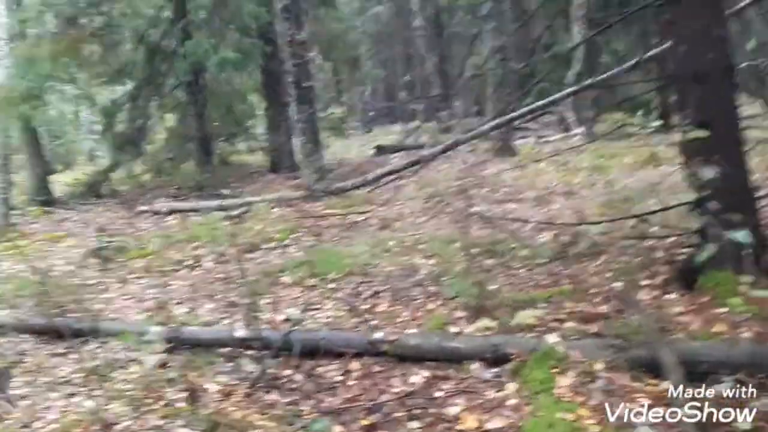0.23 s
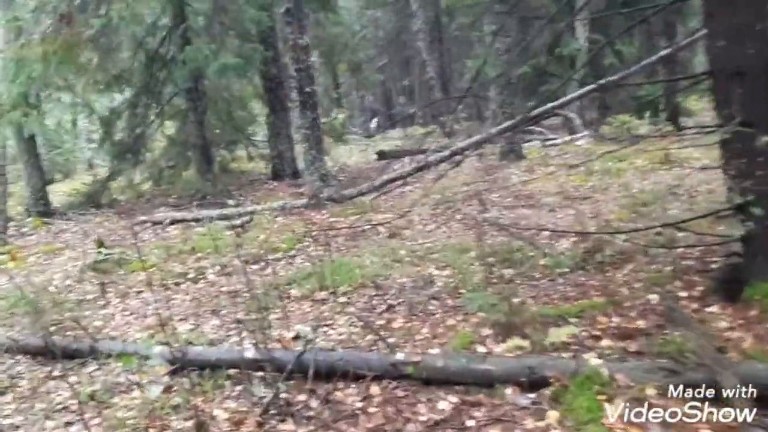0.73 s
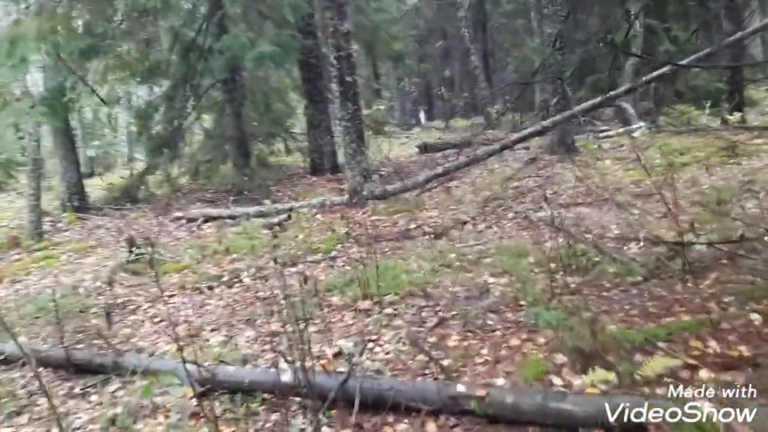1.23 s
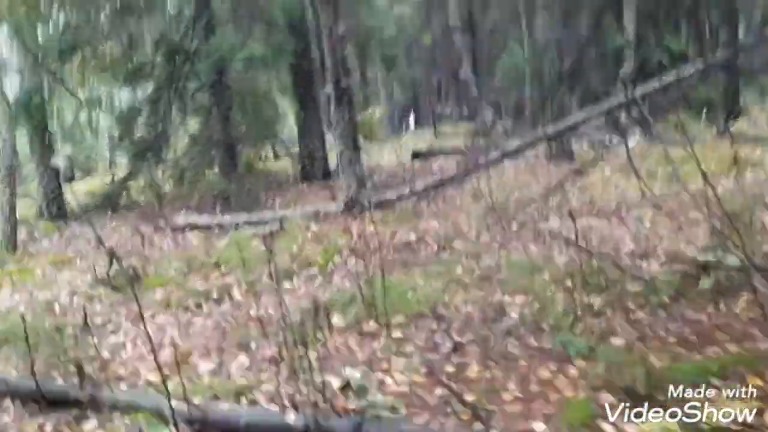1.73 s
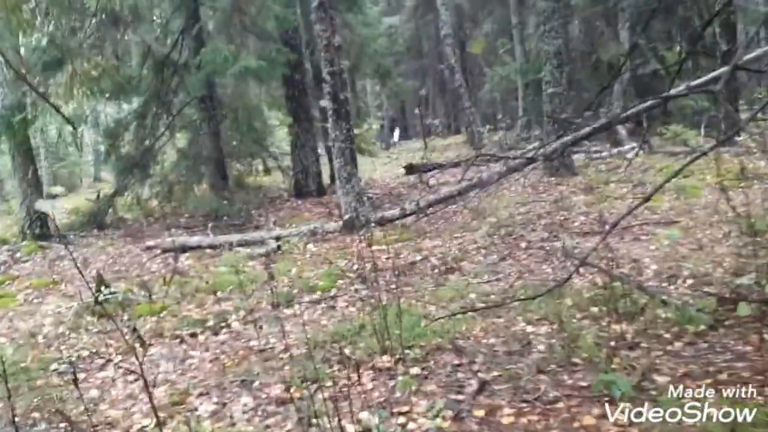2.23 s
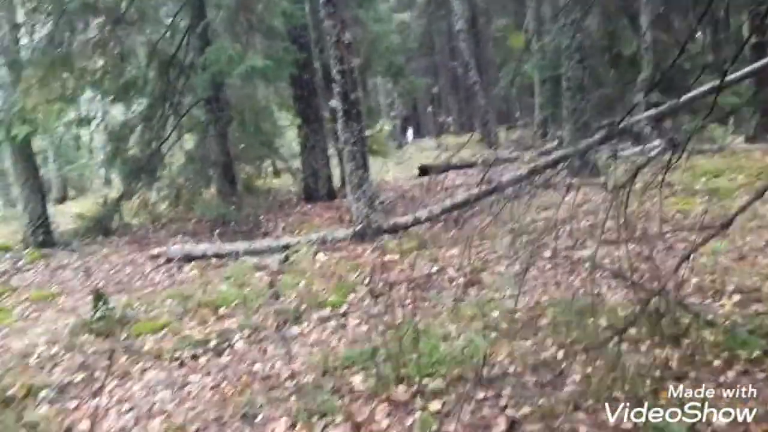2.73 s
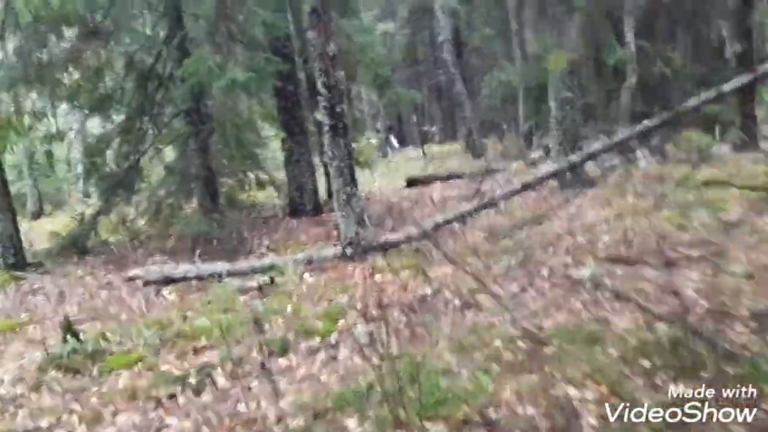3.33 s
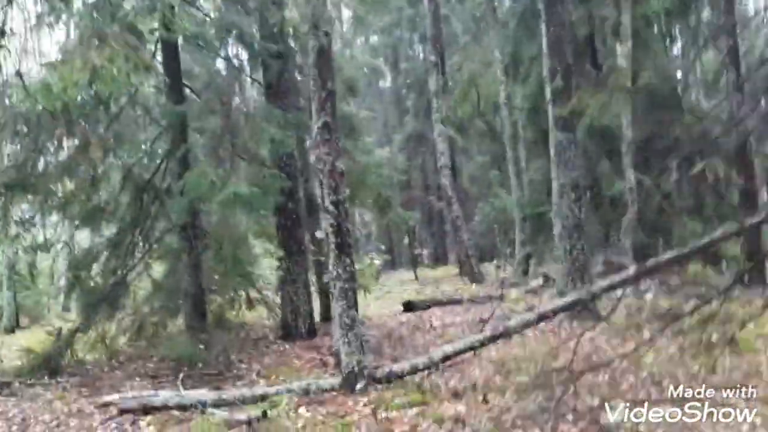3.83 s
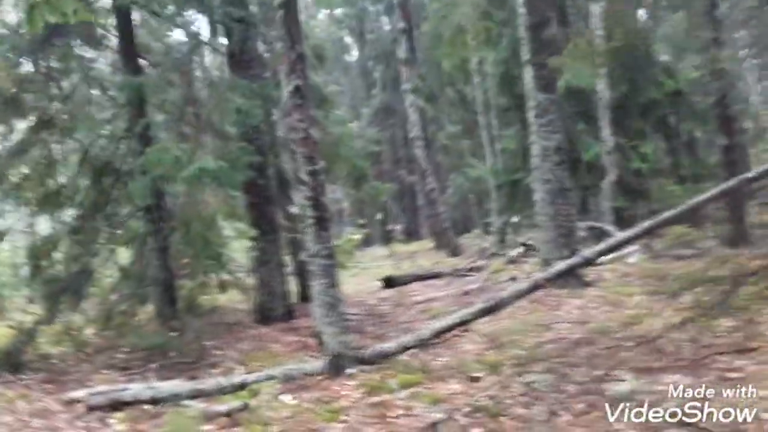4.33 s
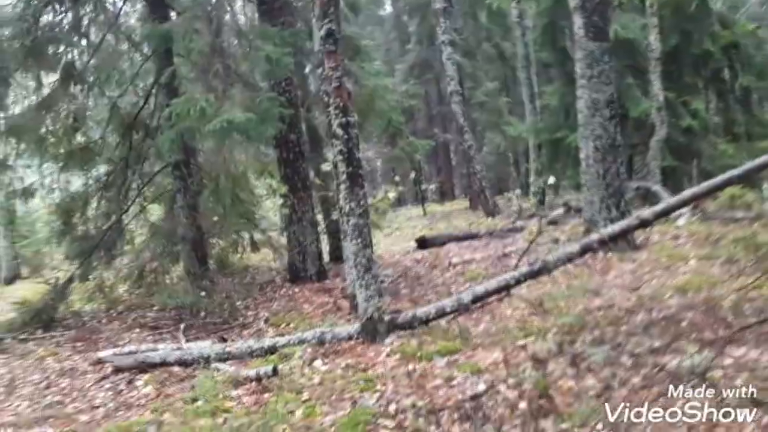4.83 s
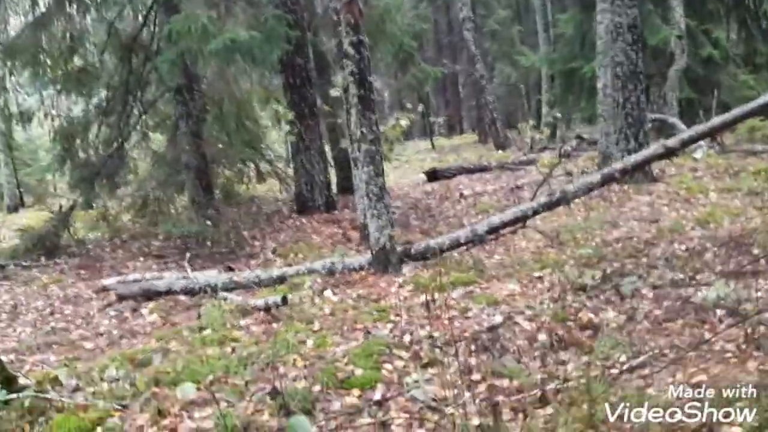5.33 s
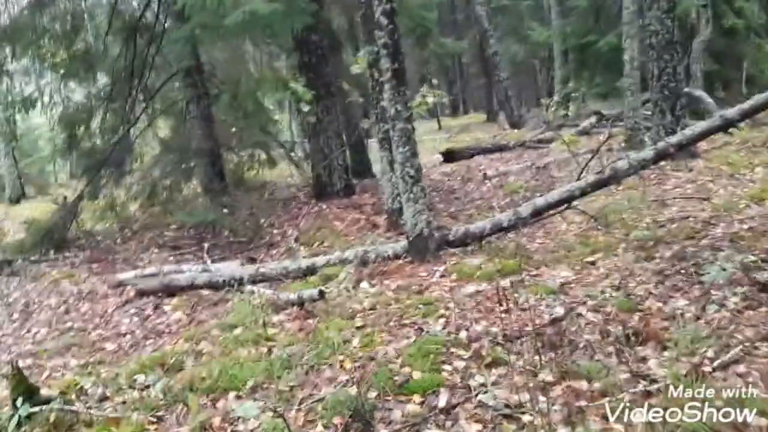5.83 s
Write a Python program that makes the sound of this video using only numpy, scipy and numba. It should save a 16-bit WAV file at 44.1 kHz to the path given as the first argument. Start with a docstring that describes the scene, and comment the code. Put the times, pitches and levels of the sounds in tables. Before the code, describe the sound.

Irregular slow steps through forest litter: leaves crinkle, the sole scuffs, twigs crack and rotten wood pops softly underfoot. A calmer middle has light stem swishes and a very faint hollow tone, then a sharp bright snap comes past four seconds and a brisk leafy burst follows. The sound is near, dry and wide in stereo, captured by a handheld device in still outdoor air, with small wind-like bumps on the right.

```python
"""Dry leaves rustle, a twig cracks and soft soil gives: someone holding a phone walks slowly in a still forest.
Each step is noise and tiny clicks, coloured as leaves, scuffing sole or soil, that follow the foot's moves.
Twigs, leaf stalks and popping wood are short noise bursts; dull knocks are ringing noise; all these echo briefly.
Bells of deep noise are air bumping the right microphone port; bright noise is dry stems swishing on a trouser leg.
Underneath lie steady airy noise and a faint, hollow drone: noise narrowed to one pitch, wavering in level."""
import sys
import numpy as np
from scipy import signal
from scipy.fft import rfft, irfft
from scipy.io import wavfile
from numba import njit

SR = 44100
rng = np.random.default_rng(int(sys.argv[2]) if len(sys.argv) > 2 else 0)


def generate_wav(signal):
    """Clip the signal to [-1, 1] and save it as 16-bit WAV at the path in sys.argv[1]."""
    frames = np.transpose(np.atleast_2d(signal))
    scaled = np.clip(frames, -1, 1) * 32767
    pcm = np.round(scaled).astype(np.int16)
    wavfile.write(sys.argv[1], SR, pcm)


N = 267819
TIME = np.arange(N) / SR  # seconds
TOP_HZ = 16200  # upper limit of the sound

# a foot swings through the litter: middle_s, length_s, leaf_level_db, scuff_level_db, left_minus_right_db
FOOT_SWINGS = [(0.026, .14, -56, -57.5, 2), (0.439, 0.083, -60, -61, 1), (1.05, .1, -53.5, -60.5, -3),
               (1.578, .05, -59.5, -80.5, -1), (2.14, .09, -71, -54, -1.5), (3.393, .17, -54.5, -61, -3),
               (3.66, .16, -49.5, -55, 1.5), (3.898, .1, -52.5, -51, 0.5), (4.269, .15, -52, -57, 4),
               (4.52, .13, -59, -61, 1.5), (4.849, .15, -59, -66, -0.5), (5.233, .17, -56.5, -58.5, -4),
               (5.369, .035, -42, -62, -1.5), (5.539, .14, -45, -48.5, -1), (5.658, .11, -39, -42, -4.5),
               (6.058, .08, -55.5, -55, -0.5)]
# the sole comes down and crushes leaves: start_s, hold_s, leaf_level_db, scuff_level_db
LEAF_CRUSHES = [(0.254, .13, -62.5, -51), (0.637, 0.087, -59.5, -60.5), (0.767, .22, -53.5, -57),
                (1.288, .03, -55, -60), (1.607, 0.29, -52.5, -56), (2.459, .11, -54.5, -56.5),
                (2.727, .1, -60.5, -68.5), (3.226, .08, -57.5, -67.5), (3.464, .12, -78, -56),
                (4.025, .06, -52, -58.5), (4.102, .08, -63, -56.5), (4.33, .025, -47, -57.5),
                (5.724, 0.032, -48.5, -50.5)]
# the weight of the body bears on the soil: start_s, hold_s, level_db
SOIL_TREADS = [(0.024, 0.022, -56), (0.646, 0.074, -57.5), (0.763, .22, -56), (1.295, 0.067, -61),
               (1.615, 0.29, -51.5), (2.026, 0.045, -55), (2.338, 0.07, -62), (3.49, 0.2, -53),
               (4.095, 0.081, -50.5), (4.202, 0.23, -59), (5.384, 0.077, -53.5), (5.517, 0.27, -51.5)]
# tone colour of crisp leaves: frequency_hz, relative_level_db
LEAF_COLOUR = [(1200, -2), (2500, 7), (4000, 3.5), (7500, 5.5), (12500, -1), (16000, -4)]
# tone colour of the scuffing sole: frequency_hz, relative_level_db
SCUFF_COLOUR = [(250, -14.5), (650, -7.5), (1050, 1.5), (1500, -5), (2200, -1), (3300, -6.5), (6000, -23)]
# tone colour of pressed soil: frequency_hz, relative_level_db
SOIL_COLOUR = [(25, -33), (70, -6.5), (190, -9), (310, 4.5), (480, 1.5), (750, -10.5), (1500, -60)]
# tone colour of the still air: frequency_hz, relative_level_db
AIR_COLOUR = [(25, -9), (80, 2), (200, -6.5), (1200, -10.5), (16000, -22)]
# level of the drone, held steady before the first and after the last row: time_s, level_db
DRONE_LEVELS = [(2.6, -74), (2.8, -67), (3.05, -63.5), (3.18, -74.5), (3.29, -63), (3.45, -82)]
# how alike the two microphone ports hear a sound: frequency_hz, correlation (no unit)
PORT_LIKENESS = [(60, 0.43), (290, 0.98), (1400, 0.29), (3100, 0.13), (6800, 0.25), (14000, 1)]
# twigs and stalks breaking: start_s, level_db (over 1 ms, before a trim), pitch_hz, left_minus_right_db
TWIG_SNAPS = [(0.0269, -31, 3670, 5), (0.3046, -29, 5000, -13), (0.7651, -18.5, 6700, -3),
              (0.7677, -25, 6270, 2.5), (0.8586, -30, 7690, -5), (0.863, -27.5, 2600, 3),
              (0.8947, -34, 7500, -1.5), (0.9385, -29.5, 5560, 7), (1.23, -30.5, 1720, -3),
              (1.246, -34.5, 2580, 4), (1.2969, -19.5, 4650, 0), (1.6822, -18.5, 8450, 4),
              (1.705, -19.5, 6540, 2.5), (2.032, -34.5, 3600, 6), (2.5422, -23.5, 1840, -5.5),
              (2.7096, -27, 2560, -2.5), (2.725, -28.5, 2780, 0.5), (3.4627, -31.5, 1980, -14),
              (3.5751, -25, 6660, 1), (3.6014, -30, 6370, 2), (3.607, -30.5, 11610, 12),
              (3.6297, -29, 8000, 11), (3.649, -21, 8000, 4), (4.1993, -32, 5660, -1),
              (4.2588, -24.5, 5140, 4), (4.3247, -11.5, 7550, -1.5), (5.2975, -32, 4100, 0),
              (5.7341, -19.5, 1950, 2), (5.7601, -29, 2980, 7), (5.7632, -23.5, 5890, 0)]
# dull knocks as the ground gives, deeper where the humus is thick: start_s, peak_db, ring_hz
GROUND_KNOCKS = [(.027, -36.5, 352), (.646, -34, 258), (1.297, -41.5, 370), (1.704, -34.5, 272),
                 (1.974, -43.5, 373), (2.351, -46.5, 274), (2.394, -44, 166), (3.462, -39.5, 274),
                 (3.648, -33.5, 345), (4.104, -36, 410), (4.133, -37, 370), (4.323, -35.5, 354),
                 (4.401, -35, 456), (5.733, -29, 380)]
# air bumping the right port: middle_s, peak_db (before a trim), length_s
AIR_BUMPS = [(0.117, -35.5, 0.027), (0.155, -31.5, 0.011), (0.233, -42.5, 0.02), (1.13, -35.5, 0.012),
             (1.737, -39, 0.015), (1.876, -44, 0.073), (3.589, -47.5, 0.1), (5.814, -36, 0.012)]
# tone colour of the bumping air: frequency_hz, relative_level_db
BUMP_COLOUR = [(30, -11), (85, 3), (130, -9), (400, -61)]
# cones and rotten wood popping, muffled under the sole: start_s, level_db (over 1 ms)
WOOD_POPS = [(.403, -29.5), (.442, -42.5), (.4653, -37.5), (.4804, -34.5), (.497, -47), (.511, -38),
             (.6459, -35.5), (.71, -34), (1.909, -37.5), (4.118, -38.5), (4.133, -43.5), (4.152, -36),
             (4.178, -39), (4.218, -35), (5.521, -30.5)]
# the clearest ticks of dry leaf stalks: start_s, level_db (over 1 ms)
STALK_TICKS = [(.983, -32.5), (1.127, -38.5), (1.2105, -41), (1.616, -36.5), (1.792, -36.5), (2.501, -41),
               (2.565, -34), (3.137, -50), (4.25, -34), (4.2617, -30.5), (4.418, -32.5), (4.589, -43.5),
               (5.462, -34.5)]
# light swishes, as of dry stems brushing a trouser leg: middle_s, length_s, level_db
STEM_SWISHES = [(2.933, 0.025, -59.5), (3.005, 0.027, -57), (3.068, 0.017, -55), (3.243, 0.027, -50),
                (3.332, 0.12, -60), (4.246, 0.055, -56), (5.69, 0.032, -54)]
# tone colour of a swish before its bass is cut: frequency_hz, relative_level_db
SWISH_COLOUR = [(2000, -5.5), (15000, -5.5)]

# a load builds up quickly, sags while held, then settles faster still
ATTACK_S, SAG_DB_PER_S = .027, 15
# settling comes on top of the sag
LEAVES_SETTLE_DB_PER_S, SOIL_SETTLE_DB_PER_S = 120.5, 260
# the litter never lies quite still under a standing walker
STIR_LEAF_DB, STIR_SCUFF_DB = -68.5, -81
SCUFF_TO_SOIL_DB = -11  # share of every scuff that reaches the soil
SWELL_POWER = 1.6  # shape of a swing: 2 is a round bell, less is more pointed


def undb(db):
    """Turn decibels into a gain."""
    return 10 ** (np.asarray(db) / 20)


def unit(x):
    """Scale to an average (rms) strength of 1."""
    return x / np.sqrt(np.mean(x ** 2))


def freqs(x):
    """List the frequency of each spectrum bin, moved up 1 Hz so its logarithm exists."""
    return np.fft.rfftfreq(x.shape[-1], 1 / SR) + 1


def along(points, hz):
    """Read a table between its rows, with pitch spaced as the ear hears it."""
    table_hz, value = np.transpose(points)
    return np.interp(np.log(hz), np.log(table_hz), value)


def colour(x, points):
    """Shape the spectrum with a table of frequencies and levels."""
    gains = undb(along(points, freqs(x)))
    return irfft(rfft(x) * gains, x.shape[-1])


def ports(pair):
    """Mix two unrelated signals into left and right, as alike as the ports hear them."""
    likeness = np.clip(along(PORT_LIKENESS, freqs(pair)), -.98, .98)
    mid, side = rfft(pair) * np.sqrt([1 + likeness, 1 - likeness])
    return irfft(np.array([mid + side, mid - side]), pair.shape[-1])


def pan(db):
    """Give left and right gains that keep the total power constant."""
    gains = undb(np.array([[.5], [-.5]]) * db)
    return gains / np.sqrt(np.mean(gains ** 2, axis=0))


def butter(x, hz, kind, order=2):
    """Cut the treble ("low") or the bass ("high") from a given frequency on."""
    sections = signal.butter(order, min(hz, SR / 2 - 500), kind, fs=SR, output="sos")
    return signal.sosfilt(sections, x)


def ring(x, hz, width_hz):
    """Pass a sound through one resonance with gain 1 at its centre."""
    return signal.lfilter(*signal.iirpeak(hz, hz / width_hz, fs=SR), x)


@njit
def glide(x, hz, q):
    """A resonance whose centre moves every sample, gain 1 at the centre."""
    y, band, low = np.empty(len(x)), 0., 0.
    for i in range(len(x)):
        g = np.tan(np.pi * hz[i] / SR)
        v = (band + g * (x[i] - low)) / (1 + g * (g + 1 / q))
        band, low, y[i] = 2 * v - band, low + 2 * g * v, v / q
    return y


def wander(rate_hz):
    """Drift in straight lines between random values, with a spread near 1."""
    knots = rng.standard_normal(4096)
    return np.interp(TIME * rate_hz, np.arange(len(knots)), knots)


def add(out, start_s, sound):
    """Mix a sound in at a time."""
    i = max(int(start_s * SR), 0)
    out[:, i:i + sound.shape[-1]] += sound[..., :N - i]


def crackle(spectrum, rate_hz, spread_db, smooth_db, flicker_db, flicker_hz):
    """Many tiny contacts of unequal size over a smooth sliding hiss, flickering together in level."""
    sizes = undb(spread_db * np.minimum(rng.exponential(size=N), 5))
    contacts = rng.random(N) < rate_hz / SR
    clicks = contacts * sizes * rng.standard_normal((2, N))
    grains = unit(clicks) + undb(smooth_db) * rng.standard_normal((2, N))
    flicker = undb(flicker_db * wander(flicker_hz))
    return unit(colour(ports(grains * flicker), spectrum))


def snap(hz, splinter_s=0.0026):
    """A sharp crack, splintering fibres, then scatter from the ground; rms 1 over a millisecond."""
    crack_s, scatter_s = 0.00077, 0.015
    splinter_db, scatter_db = -15, -30
    t = np.arange(4096) / SR
    splinters = ports(rng.standard_normal((2, len(t))))
    scatter = ports(rng.standard_normal((2, len(t))))
    crack = rng.standard_normal(len(t)) * np.exp(-t / crack_s)
    # the crack reaches one port, chosen at random, a little before the other
    lag = int(SR * rng.uniform(0.00009, 0.00045))
    crack = rng.permutation([crack, np.roll(crack, lag)])
    # the fibres give unevenly: a new random level every 16 samples
    fibres = undb(3 * rng.standard_normal(len(t) // 16)).repeat(16)
    burst = crack + undb(splinter_db) * splinters * fibres * np.exp(-t / splinter_s)
    burst = burst + undb(scatter_db) * scatter * np.exp(-t / scatter_s)
    # thick or buried wood loses its treble, thin wood its bass
    dull_hz, thin_hz = hz * (0.96 + hz / 3500), 400 + hz / 24
    burst = butter(burst, dull_hz, "low")
    burst = butter(burst, thin_hz, "high", order=3)
    burst = butter(burst, TOP_HZ, "low", order=8)
    return burst / np.sqrt(np.sum(burst ** 2, axis=1, keepdims=True) / (SR / 1000))


def swell(middle_s, length_s):
    """The speed of a swinging foot: a bell in time."""
    return np.exp(-.5 * np.abs(2 * (TIME - middle_s) / length_s) ** SWELL_POWER)


def load(start_s, hold_s, settle_db_per_s):
    """The pressure of a sole: attack, sagging hold, release."""
    age = np.maximum(TIME - start_s, 0)
    settling = settle_db_per_s * np.maximum(age - hold_s, 0)
    return np.minimum(age / ATTACK_S, 1) * undb(-SAG_DB_PER_S * age - settling)


def footwork():
    """How hard leaves and scuff (left and right) and soil are worked; the moves add in power."""
    moves = [(swell(s, length), *rest) for s, length, *rest in FOOT_SWINGS]
    # crushes are centred between left and right
    moves += [(load(s, hold, LEAVES_SETTLE_DB_PER_S), *rest, 0) for s, hold, *rest in LEAF_CRUSHES]
    leaf, scuff = undb(STIR_LEAF_DB) ** 2, undb(STIR_SCUFF_DB) ** 2
    for shape, leaf_db, scuff_db, pan_db in moves:
        power = (shape * pan(pan_db)) ** 2
        leaf = leaf + power * undb(leaf_db) ** 2
        scuff = scuff + power * undb(scuff_db) ** 2
    soil = sum((load(s, hold, SOIL_SETTLE_DB_PER_S) * undb(db)) ** 2 for s, hold, db in SOIL_TREADS)
    soil = soil + scuff.mean(axis=0) * undb(SCUFF_TO_SOIL_DB) ** 2
    return np.sqrt(leaf), np.sqrt(scuff), np.sqrt(soil)


def shifting(x, depth=0.79, rate_hz=28, glide_octaves=0.17, q=13, count=9):
    """Gaps between the leaves open and close under the foot, so narrow resonances come, glide and go."""
    out = x
    for hz in np.geomspace(1200, 9000, count):
        centre = np.minimum(hz * 2 ** (glide_octaves * wander(rate_hz)), TOP_HZ)
        resonance = np.array([glide(channel, centre, float(q)) for channel in x])
        out = out + depth * wander(rate_hz) * resonance
    return out


def stalks(rustle_db, weight, above_db=2.0, range_db=6, count=400):
    """Stalks and needles tick at random, oftener under weight and louder the harder the litter is worked."""
    out, work = np.zeros((2, N)), np.cumsum(weight ** .6)
    for share, size, thinness in rng.random((count, 3)):
        i = np.searchsorted(work, share * work[-1])
        hz = 900 * 8 ** (thinness ** 1.5)
        level_db = rustle_db[i] + above_db + range_db * size ** 2
        add(out, i / SR, snap(hz, splinter_s=0.00047) * undb(level_db))
    return out


def litter():
    """Leaves crinkle and tick, the sole scuffs through them and the soil is pressed down."""
    leaf_work, scuff_work, soil_work = footwork()
    leaves = leaf_work * crackle(LEAF_COLOUR, rate_hz=2700, spread_db=0.5, smooth_db=3.0,
                                 flicker_db=2.0, flicker_hz=120)
    scuff = scuff_work * crackle(SCUFF_COLOUR, rate_hz=570, spread_db=2.0, smooth_db=0.5,
                                 flicker_db=1.5, flicker_hz=110)
    soil = soil_work * crackle(SOIL_COLOUR, rate_hz=660, spread_db=-1.5, smooth_db=-1,
                               flicker_db=4.0, flicker_hz=63)
    rustle = np.maximum(leaf_work * undb(-4), scuff_work)
    both = rustle.mean(axis=0)
    # the ticks lean to the side where the litter is worked harder
    ticking = stalks(20 * np.log10(both), soil_work) * rustle / both
    return shifting(leaves + scuff) + ticking + soil


def forest(air_db=-72, drone_hz=316, pass_width_hz=65):
    """Faint steady air, and a hollow drone made by passing noise twice through one resonance."""
    air = unit(colour(ports(rng.standard_normal((2, N))), AIR_COLOUR))
    drone = ring(ports(rng.standard_normal((2, N))), drone_hz, pass_width_hz)
    drone = ring(drone, drone_hz, pass_width_hz)
    drone_level = undb(np.interp(TIME, *np.transpose(DRONE_LEVELS)))
    return undb(air_db) * air + unit(drone) * drone_level * pan(4.1)


def twigs(trim_db=-1):
    """Twigs break under the weight of the walker, each with a sharp snap."""
    out = np.zeros((2, N))
    for s, db, hz, pan_db in TWIG_SNAPS:
        add(out, s, snap(hz) * undb(db + trim_db) * pan(pan_db))
    return out


def thuds(decay_s=0.0096, width_hz=230, top_hz=1000):
    """The hollow, springy humus rings low and damps each knock within a few cycles."""
    out, t = np.zeros((2, N)), np.arange(4096) / SR
    for s, db, hz in GROUND_KNOCKS:
        push = ports(rng.standard_normal((2, len(t)))) * np.exp(-t / decay_s)
        knock = butter(ring(push, hz, width_hz), top_hz, "low")
        add(out, s, knock * undb(db) / np.abs(knock).max())
    return out


def trunks(x, t60_s=0.29, wet_db=-21, top_hz=7000):
    """Thin, scattered reflections from the trees: noise that builds up at once and fades 60 dB in t60_s."""
    t = np.arange(SR // 2) / SR
    echoes = rng.standard_normal((2, len(t))) * undb(-60 * t / t60_s) * (1 - np.exp(-t / 0.0011))
    echoes = butter(echoes, top_hz, "low", order=1)
    echoes = echoes / np.sqrt(np.sum(echoes ** 2) / 2)
    return undb(wet_db) * signal.fftconvolve(x, echoes, axes=1)[:, :N]


def puffs(trim_db=-1, left_db=-18):
    """Slow eddies press on the right port and barely reach the left."""
    out, t = np.zeros((2, N)), np.arange(SR // 2) / SR
    for s, db, length in AIR_BUMPS:
        lead = min(s, t[-1] / 2)  # start early enough for the bell to rise
        bell = np.exp(-.5 * ((t - lead) / length) ** 2)
        eddy = colour(rng.standard_normal((2, len(t))), BUMP_COLOUR) * bell
        peak = np.abs(eddy).max(axis=1, keepdims=True)
        add(out, s - lead, eddy * undb(db + trim_db) / peak)
    return out * undb([[left_db], [0]])


def small_breaks(rows, hz, spread_octaves=.1):
    """Small things give way around the foot, each a little different in pitch and place."""
    out = np.zeros((2, N))
    for (s, db), (pitch, place) in zip(rows, rng.standard_normal((len(rows), 2))):
        burst = snap(hz * 2 ** (spread_octaves * pitch))
        add(out, s, burst * undb(db) * pan(2 * place))
    return out


def pops():
    """Cones and rotten wood pop under the sole, which muffles their treble."""
    return small_breaks(WOOD_POPS, hz=1100)


def ticks():
    """Dry leaf stalks break with small, bright ticks."""
    return small_breaks(STALK_TICKS, hz=3500)


def swishes():
    """Stems rub with fine, dense friction, almost all treble, that swells and fades with speed."""
    speed = sum(swell(s, length) * undb(db) for s, length, db in STEM_SWISHES)
    grain = crackle(SWISH_COLOUR, rate_hz=6000, spread_db=-3.0, smooth_db=6,
                    flicker_db=5.5, flicker_hz=220)
    return speed * butter(grain, 2200, "high")


def scene():
    """The steps, the reflections of what breaks and knocks, and the air around them."""
    breaks = twigs() + thuds() + pops() + ticks()
    return litter() + forest() + breaks + trunks(breaks) + puffs() + swishes()


def record(dry):
    """Each microphone port has its own treble resonances; the deep bass and the top are cut."""
    left = dry[0] + undb(-4.0) * ring(dry[0], 12400, 2100)
    right = dry[1] + undb(-1.5) * ring(dry[1], 5600, 1900) + .5 * ring(dry[1], 13200, 1700)
    both = np.array([left, right])
    # both ports share a dip in the treble
    both = both - undb(-5.5) * ring(both, 9800, 1950)
    both = butter(both, 30, "high")
    return signal.sosfilt(signal.ellip(10, .2, 80, TOP_HZ, fs=SR, output="sos"), both)


dry = scene()
out = record(dry)
generate_wav(out)
```